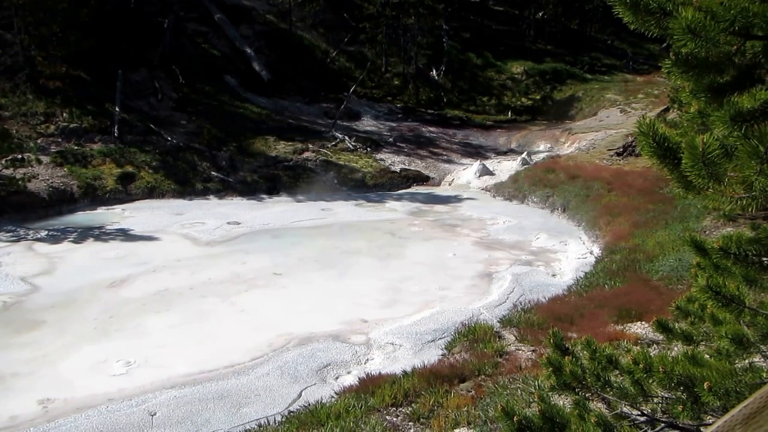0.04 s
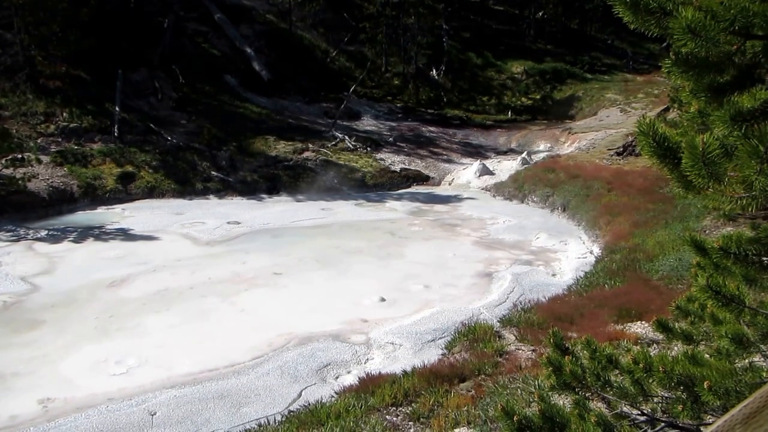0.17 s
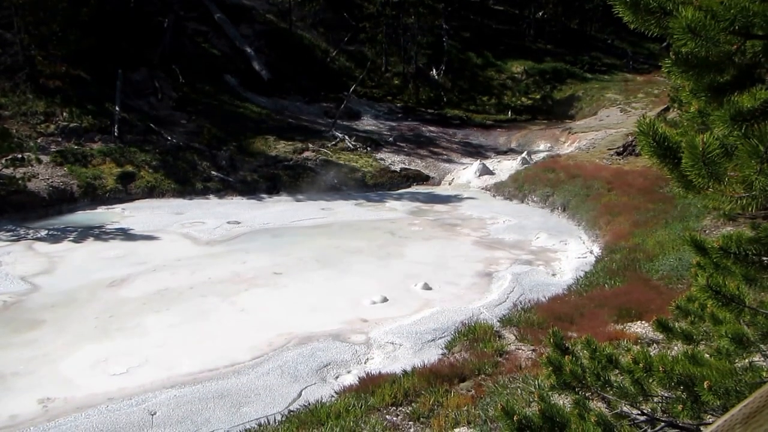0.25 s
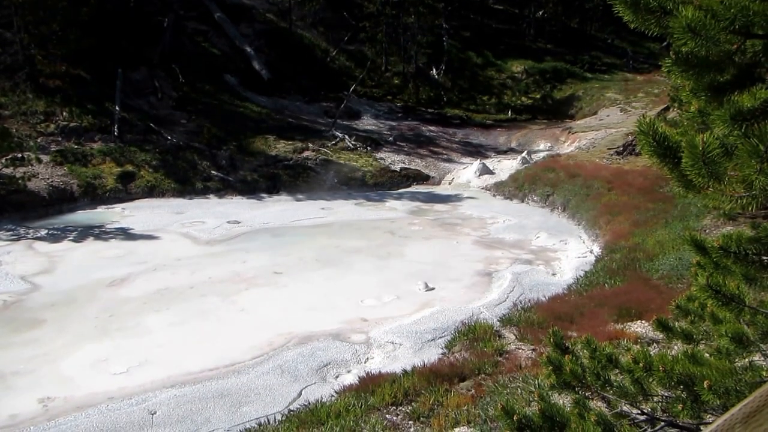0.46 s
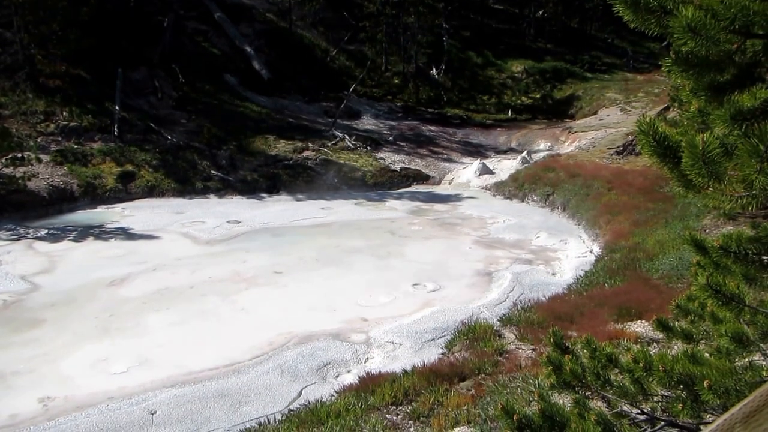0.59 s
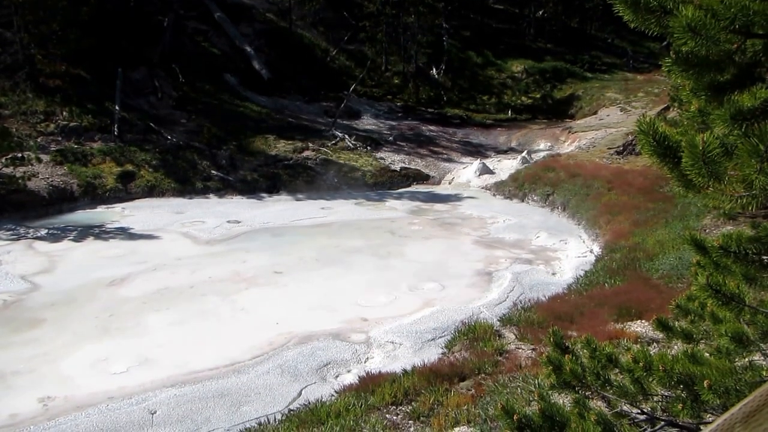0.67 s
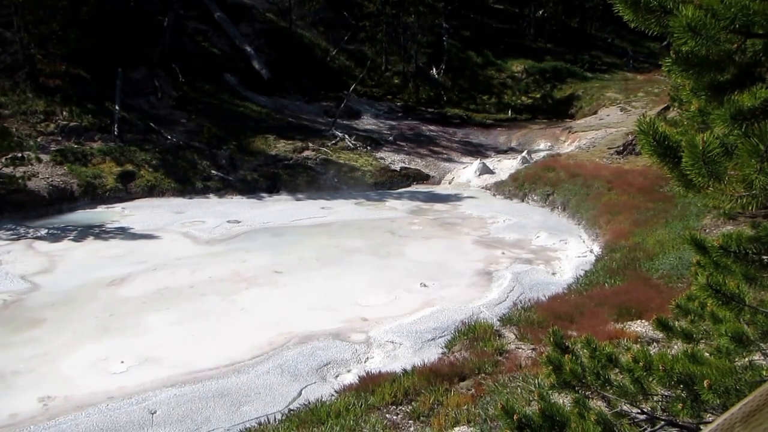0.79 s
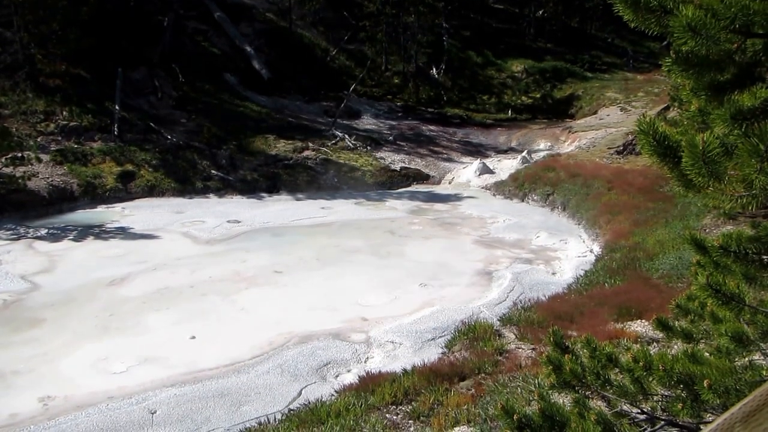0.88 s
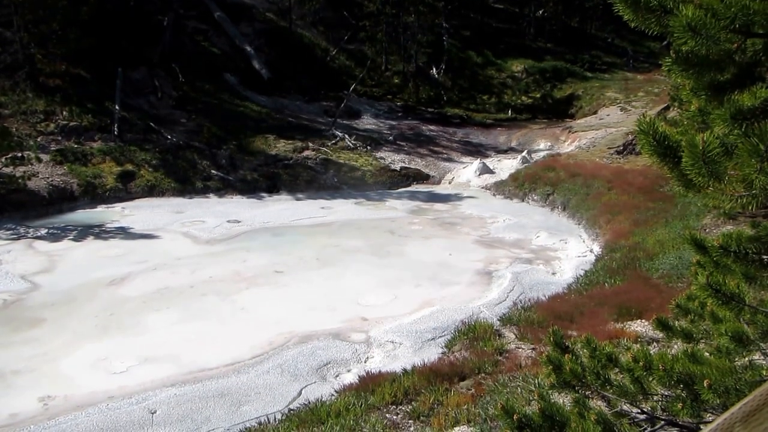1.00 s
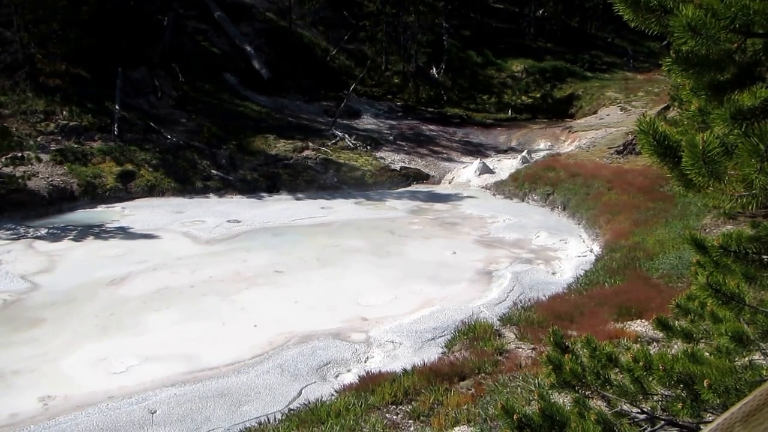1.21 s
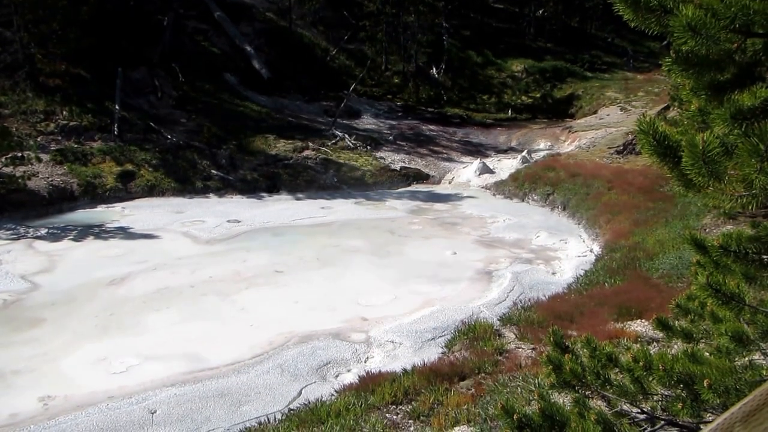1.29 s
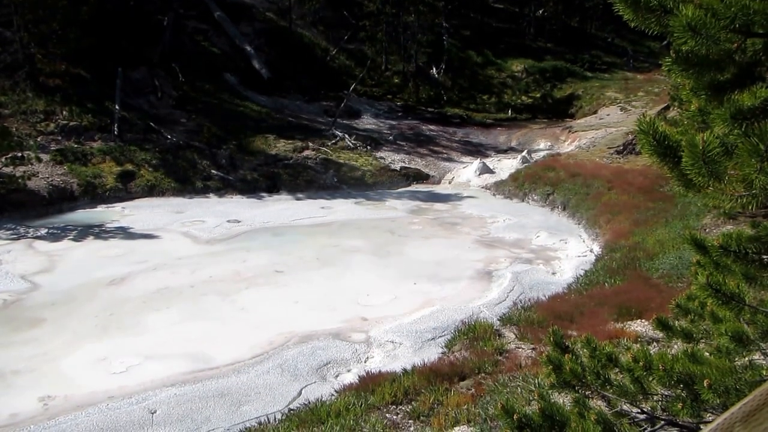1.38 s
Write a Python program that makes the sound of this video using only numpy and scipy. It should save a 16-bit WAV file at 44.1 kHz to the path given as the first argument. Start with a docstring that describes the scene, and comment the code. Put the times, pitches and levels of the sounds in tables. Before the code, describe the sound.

A mud pool bubbles close by outdoors, giving separate low plops, a sharp snap, then a quick cluster around one louder pop. Behind it are faint, high insect trills, a steady hush and a low, uneven rumble.

```python
"""A forest clearing, one microphone beside a pool of hot mud. Close by, gas bubbles burst with short plops
whose pitch glides as the cavity opens; thin skins snap and flecks of mud tick back down. Small bubbles
simmer farther off, and the banks scatter a faint echo. Insects trill and chirp with their wings, blurred
by the foliage, behind a steady outdoor hush and a low, uneven rumble."""
import sys
import numpy as np
from scipy import signal
from scipy.fft import rfft, irfft
from scipy.io import wavfile

SR = 44100
rng = np.random.default_rng(int(sys.argv[2]) if len(sys.argv) > 2 else 0)


def file_out(sig):
    """Save sig as 16-bit WAV at sys.argv[1]."""
    # one column per channel
    cols = np.atleast_2d(sig).T
    # limit, then scale
    lim = np.clip(cols, -1, 1)
    pcm = np.round(lim * 32767).astype(np.int16)
    wavfile.write(sys.argv[1], SR, pcm)


N = 63945
TOP_HZ = 15720  # upper edge of the treble


def plop(hz, glide, swell_s, db):
    """A cavity rings for a few cycles while its opening changes size; the tearing mud roughens it."""
    t = np.arange(int(10 * swell_s * SR)) / SR
    age = t / swell_s
    envelope = age ** 2 * np.exp(2 - 2 * age)
    pitch = hz * 2 ** (glide * np.minimum(t, 4.9 * swell_s))  # settles after 4.9 swell times
    ring = np.sin(2 * np.pi * np.cumsum(pitch) / SR)
    tearing = band(rng.standard_normal(SR // 4), 1.6 * hz, octaves=1.128)
    squelch = undb(-19.5) * unit(tearing)[-len(t):]
    return undb(db) * envelope * (ring + squelch)


def near_bubbles():
    """Gas breaks through the mud close to the microphone in short plops; one burst rings at two pitches at
    once."""
    # bursts (time [s], starting pitch [Hz], glide [octaves/s], swell time [s], peak level [dB])
    bubbles = [ (0.1649, 143, -42.5, 0.0094, -33.5), (0.2797, 225.4, 95, 0.00281, -22.5),
               (.2900, 418, -10.5, 0.0079, -46.5), (0.3293, 171, 33, 0.00348, -37),
               (.3700, 484, 39, .002, -40), (.4800, 312.4, 16.5, 0.00862, -40.5),
               (.6210, 495, 30.5, 0.00455, -43), (0.7525, 1765, -65.5, .0013, -20.5),
               (.7526, 2627, -5.5, 0.000934, -32.5), (0.766, 275.4, -38.5, 0.00605, -33),
               (0.7879, 275.2, 80.5, 0.00445, -39), (0.811, 283, 1, 0.00117, -25.5),
               (.8140, 617, 17.5, 0.00179, -35.5), (0.9234, 162.2, 88, .0037, -31),
               (0.9598, 130.7, 84, 0.0074, -35.5), (1.035, 176.7, 103, 0.0056, -29.5),
               (1.062, 247, 25.5, 0.00236, -34), (1.1039, 448.4, 64, 0.001139, -11),
               (1.1415, 913, 13, 0.00102, -27.5), (1.1450, 458, 100, 0.00074, -33.5),
               (1.1510, 644, 1.5, 0.0038, -32.5), (1.163, 204, 8, 0.00305, -38),
               (1.1801, 220.4, 57.5, 0.0016, -30), (1.1910, 230.1, 101, 0.0027, -28.5), ]
    out = np.zeros(N)
    for start, hz, glide, swell_s, db in bubbles:
        add(out, start, plop(hz, glide, swell_s, db))
    return out


def wet_ticks(decay_s=0.000934):
    """Thin skins snap and flecks of mud land, each a tiny burst of noise."""
    # snaps and landings (time [s], centre [Hz], width [octaves], peak level [dB])
    ticks = [(0.071, 2270, 1.15, -36), (0.328, 1760, 0.567, -37), (0.3709, 2185, 0.53, -37),
             (.402, 1915, 0.443, -37.5), (.524, 2417, 0.426, -40.5), (0.5515, 2300, 0.83, -43),
             (0.617, 2620, 0.69, -36.5), (0.621, 2410, 0.35, -39.5), (.7528, 2183, 0.73, -34.5),
             (1.1063, 2044, 0.307, -39.5), (1.1423, 2020, 0.334, -40.5), (1.2037, 4700, 2.7, -41)]
    out = np.zeros(N)
    t = np.arange(SR // 50) / SR
    for start, hz, octaves, db in ticks:
        burst = rng.standard_normal(len(t)) * np.exp(-t / decay_s)
        tick = dull(band(burst, hz, octaves), hz=5700)
        add(out, start, undb(db) * tick / np.abs(tick).max())
    return out


def far_simmer(count=24):
    """Small bubbles burst faintly at random, farther across the pool."""
    out = np.zeros(N)
    for when, octave, strength in rng.uniform(-1, 1, (count, 3)):
        bubble = plop(hz=221.4 * 2 ** octave, glide=14, swell_s=0.0031, db=-54 + 4 * strength)
        add(out, (when + 1) / 2 * N / SR, bubble)
    return out


def wing_stroke(hz, fall_hz=812, length_s=0.02447):
    """One wing stroke: a tone that swells, sags ever faster and fades."""
    progress = np.linspace(0, 1, int(length_s * SR))
    pitch = hz - fall_hz * progress ** 1.424
    return np.sin(np.pi * progress) ** 2 * np.sin(2 * np.pi * np.cumsum(pitch) / SR)


def trilling_insects(jitter_s=0.00067, pitch_spread=0.00856):
    """The nearer insects trill over one another, each wing stroke slightly off in time and pitch."""
    # phrases (start [s], end [s], stroke rate [1/s], starting pitch [Hz], peak level [dB])
    trills = [ (.000, .150, 33.7, 6262, -51), (0.017, 0.097, 25, 6050, -55.5),
              (0.193, 0.304, 46, 6169, -55.5), (0.241, 0.318, 34, 6230, -53),
              (0.289, .395, 35.3, 6270, -49.5), (.425, .505, 29.1, 6130, -55),
              (0.527, .605, 33.1, 6159, -46.5), (.625, .735, 34.5, 6073, -53.5),
              (0.757, .840, 30.5, 6150, -50), (0.775, .885, 32.8, 6264, -49.5),
              (0.988, 1.160, 31, 6195, -51), (1.004, 1.100, 31, 6130, -55.5), (1.166, 1.260, 31, 5650, -55),
              (1.188, 1.335, 32, 6200, -53), (1.336, 1.445, 34.95, 6160, -48), ]
    out = np.zeros(N)
    for start, end, rate, hz, db in trills:
        for when in np.arange(start, end, 1 / rate):
            late, sharp = rng.standard_normal(2)
            tone = wing_stroke(hz * (1 + pitch_spread * sharp))
            add(out, when + jitter_s * late, undb(db) * tone)
    return out


def chirping_insect(period_s=0.035):
    """A lower-pitched insect chirps, three wing strokes at a time."""
    # chirps (start [s])
    chirps = [.130, .390, .718]
    out = np.zeros(N)
    tone = undb(-53) * wing_stroke(hz=5238.6, fall_hz=200, length_s=0.02276)
    for start in chirps:
        for k in range(3):
            add(out, start + k * period_s, tone)
    return out


def far_insects(strokes=44):
    """Stray wing strokes carry in from insects farther off."""
    out = np.zeros(N)
    for start in rng.uniform(0, N / SR, strokes):
        add(out, start, undb(-63) * wing_stroke(hz=6000 + rng.uniform(-286, 286)))
    return out


def scatter(x, t60_s, top_hz, build_s=0.00282):
    """Diffuse reflections that build up, fade and lose their treble."""
    t = np.arange(SR // 2) / SR
    decay = np.exp(-np.log(1000) * t / t60_s)
    onset = 1 - np.exp(-(t / build_s) ** 2)
    tail = rng.standard_normal(len(t)) * decay * onset
    reflections = signal.fftconvolve(x, tail / np.linalg.norm(tail))[:N]
    return dull(reflections, top_hz)


def hush():
    """The steady outdoor hush all around the clearing."""
    # hush spectrum (frequency [Hz], relative density [dB])
    spectrum = [(20, -5), (100, -4.5), (200, -5), (350, -11.5), (540, -7), (660, -14), (750, -20.5),
                (1150, -17), (1360, -11.5), (1550, -7.5), (1850, -17), (2450, -15.5), (3400, -28.5),
                (4200, -28.5), (5200, -23.5), (5900, -19.5), (6500, -35), (7200, -36), (11000, -36.5),
                (15500, -40.5)]
    return undb(-49.5) * noise(spectrum)


def rumble():
    """A low rumble swells and sinks under everything."""
    # rumble spectrum (frequency [Hz], relative density [dB])
    spectrum = [(15, -19.5), (28, -7), (42, 5), (60, -10.5), (85, -4), (130, -16), (300, -60)]
    # swells (time [s], level [dB])
    swells = [(0, -55.5), (.25, -55), (.4, -48.5), (.47, -51.5), (.55, -42.5), (.63, -57.5), (.72, -52.5),
              (.95, -49.5), (1.01, -44.5), (1.08, -53), (1.3, -54.5), (1.45, -47.5)]
    level_db = np.interp(np.arange(N) / SR, *np.array(swells).T)
    return undb(level_db) * noise(spectrum)


def noise(spectrum):
    """Noise of rms 1 with the given spectrum."""
    hz, db = np.array(spectrum).T
    bins_hz = np.maximum(np.fft.rfftfreq(N, 1 / SR), 1)
    gain = undb(np.interp(np.log(bins_hz), np.log(hz), db))
    return unit(irfft(rfft(rng.standard_normal(N)) * gain, N))


def band(x, hz, octaves):
    """Band-pass around a centre."""
    edges = np.clip(hz * 2 ** (np.array([-.5, .5]) * octaves), 1, SR / 2 - 1)
    return signal.sosfilt(signal.butter(2, edges, "bandpass", fs=SR, output="sos"), x)


def dull(x, hz):
    """Low-pass."""
    return signal.sosfilt(signal.butter(3, hz, fs=SR, output="sos"), x)


def undb(db):
    """Decibels to gain."""
    return 10 ** (np.asarray(db) / 20)


def unit(x):
    """Scale to rms 1."""
    return x / np.sqrt(np.mean(x ** 2) + 1e-20)


def add(out, start_s, x):
    """Mix a short sound in at its time."""
    i = max(int(start_s * SR), 0)
    if i < N:
        out[i:i + len(x)] += x[:N - i]


def scene():
    """The pool between its banks, the insects in the foliage and the open air, at one microphone."""
    mud = near_bubbles() + wet_ticks() + far_simmer()
    bank_echo = undb(-11) * scatter(mud, t60_s=0.394, top_hz=778)
    insects = trilling_insects() + chirping_insect() + far_insects()
    foliage_blur = undb(-11.5) * scatter(insects, t60_s=0.139, top_hz=TOP_HZ)
    return (mud + bank_echo + insects + foliage_blur + hush() + rumble())[None]


def record(dry):
    """The recorder cuts the top of the treble."""
    return signal.sosfilt(signal.ellip(10, .2, 70, TOP_HZ, fs=SR, output="sos"), dry)


dry = scene()
out = record(dry)
file_out(out)
```